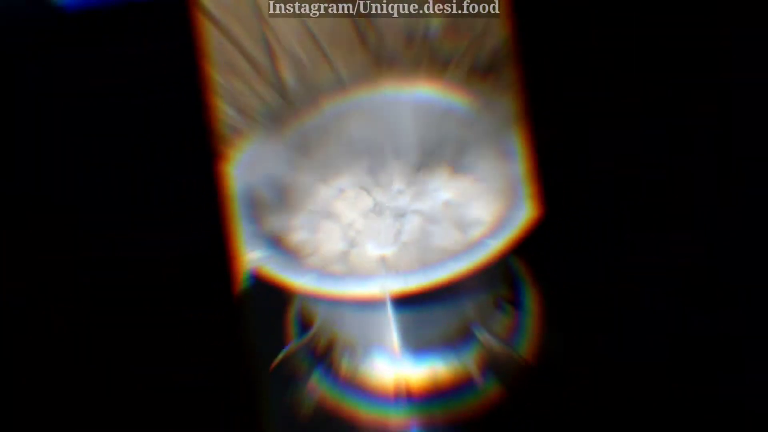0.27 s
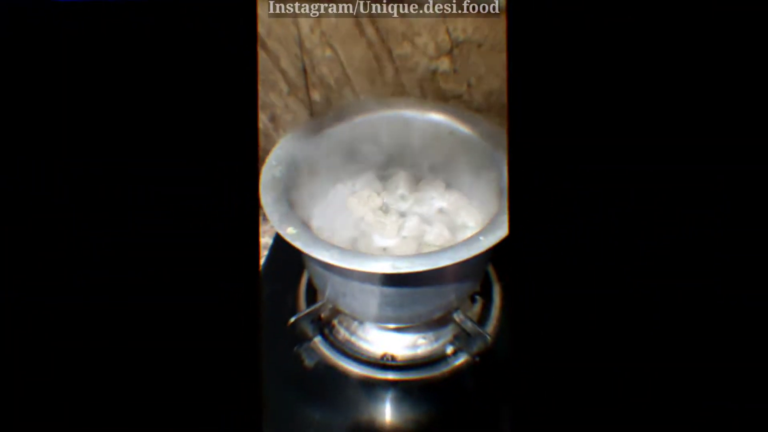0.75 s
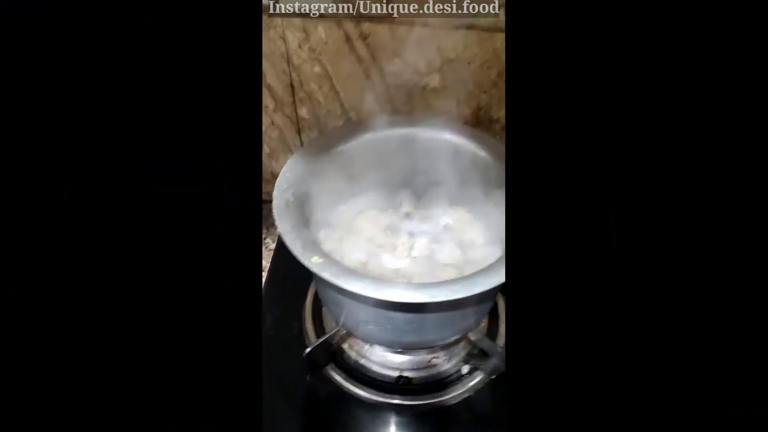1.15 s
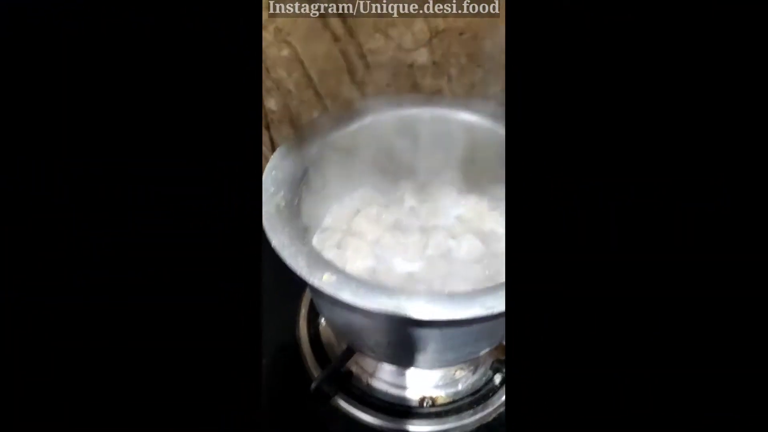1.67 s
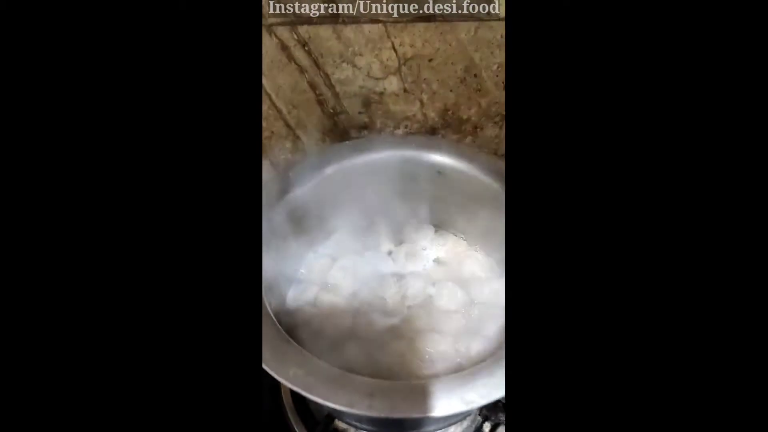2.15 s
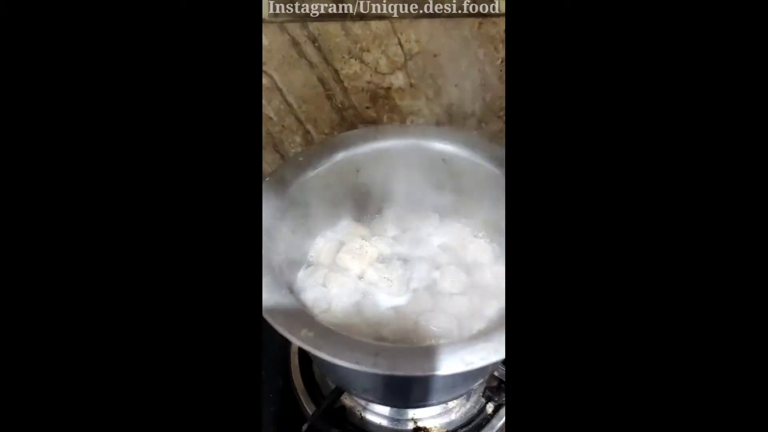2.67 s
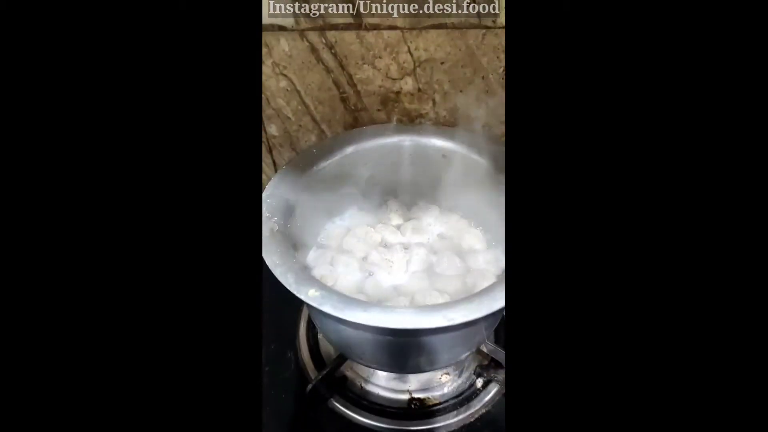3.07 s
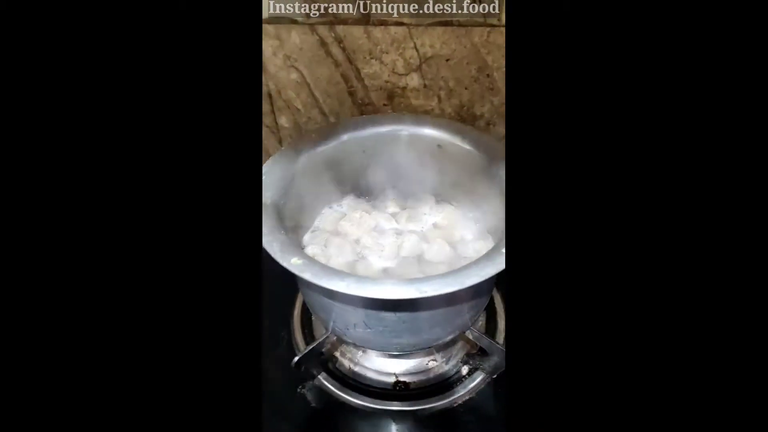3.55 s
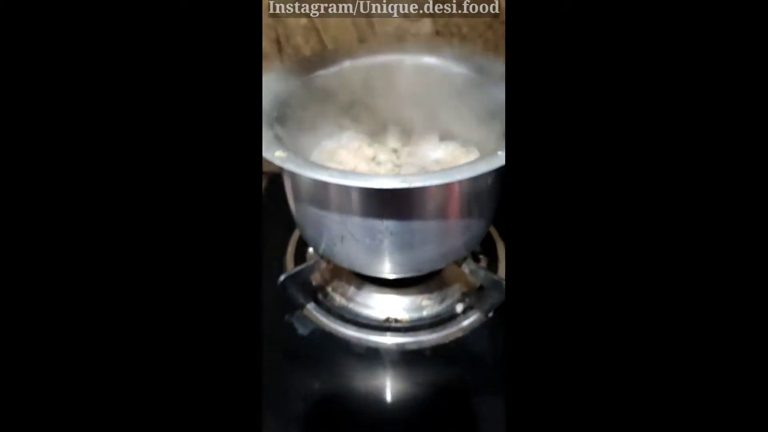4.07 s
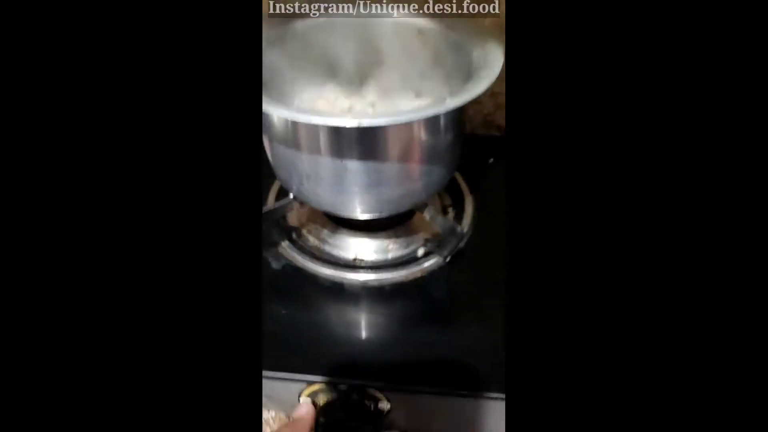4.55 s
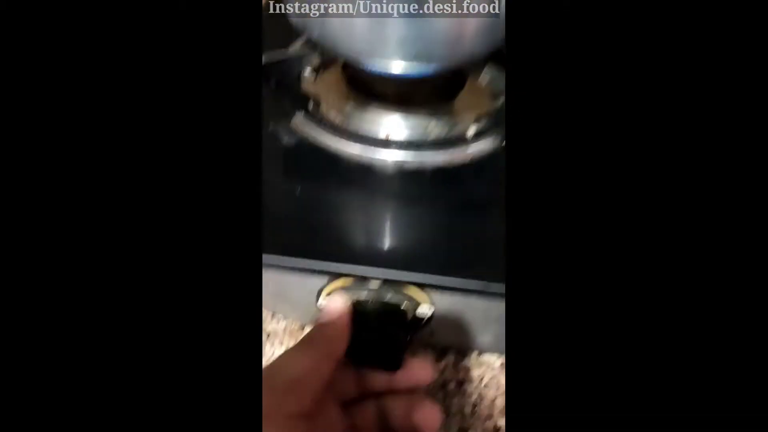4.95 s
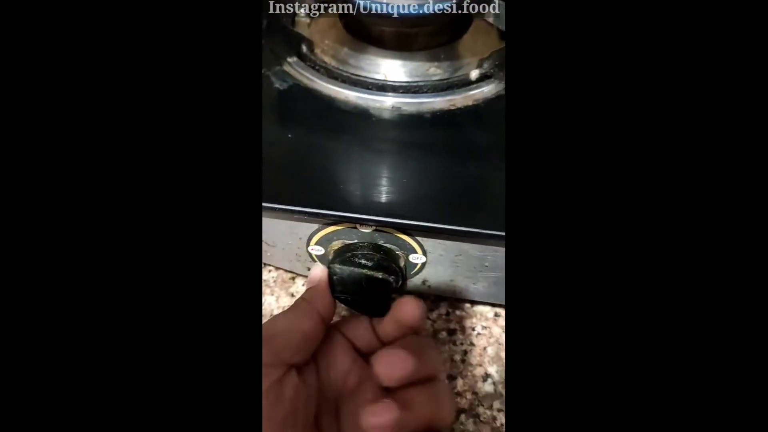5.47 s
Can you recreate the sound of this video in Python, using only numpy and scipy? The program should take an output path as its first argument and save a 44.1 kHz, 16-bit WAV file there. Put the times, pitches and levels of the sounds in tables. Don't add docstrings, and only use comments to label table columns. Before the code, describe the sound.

A busy kitchen with hard walls, heard close in stereo. From the start, water runs in uneven surges, a grainy hiss of droplets, bubbles and gurgles with small splashes and hollow plops. Thin, high bangle clinks appear at about 0.4, 0.9 and 1.8 seconds. Splashing thickens around 1.2, and a dry tap on the microphone lands near 2.1. Two short hollow knocks come at 2.3, then a bright clink and sharp splash at 2.6, and another heavy splash at 3.0. The flow eases, surging again near 3.7, with spatter around 4.4. Steel lid and vessel knocks ring dully at 4.7, 5.0 and 5.2 amid heavier splashes, and a tipped vessel gives a brief rising tone. At 5.5 a loud metallic bang rattles several times, throwing water and ringing unevenly to the end. Low traffic and burner rumble and a wavering drone run underneath throughout, with faint microphone hiss.

```python
import sys
import numpy as np
from scipy import signal
from scipy.io import wavfile

SR = 44100
rng = np.random.default_rng(int(sys.argv[2]) if len(sys.argv) > 2 else 0)


def elevation(decibels):
    levels = np.asarray(decibels, float)
    return 10 ** (levels / 20)


def generate_wav(signal):
    frames = np.transpose(np.atleast_2d(signal))
    scaled = np.clip(frames, -1, 1) * 32767
    pcm = np.round(scaled).astype(np.int16)
    wavfile.write(sys.argv[1], SR, pcm)


N = 251807
TIME = np.arange(N) / SR

# t/s, level/dB
BANG = [
    (5.519, -10.5),
    (5.558, -17),
    (5.585, -24),
    (5.629, -35),
]


def rms_one(x):
    return x / np.sqrt(np.mean(x ** 2) + 1e-20)


def at_hz(points, hz):
    f, value = np.array(points)[:, :2].T
    return np.interp(np.log(hz), np.log(np.maximum(f, 1)), value)


def filtered(x, order, corner_hz, kind):
    return signal.sosfilt(signal.butter(order, corner_hz, kind, fs=SR, output="sos"), x)


def drift(rate_hz):
    step = 40
    r = np.exp(-2 * np.pi * rate_hz * step / SR)
    white = rng.standard_normal(N // step + 2002)
    slow = signal.lfilter([1], [1, -2 * r, r * r], white)[2000:]
    return np.interp(np.arange(N) / step, np.arange(len(slow)), rms_one(slow))


def dying(start_s, t60, rise_s):
    first = int(start_s * SR)
    t = np.arange(min(int(1.2 * t60 * SR), N - first)) / SR
    return slice(first, first + len(t)), (1 - np.exp(-t / rise_s)) * elevation(-60 * t / t60)


def add_mode(out, start_s, hz, level_db, t60, rise_s):
    span, shape = dying(start_s, max(t60, .02), rise_s)
    t = np.arange(len(shape)) / SR
    out[span] += elevation(level_db) * shape * np.sin(2 * np.pi * hz * t)


def bands(low_hz, count):
    # f/Hz, likeness/-1..1
    likeness = [(60, 0.96), (110, 0.93), (200, 1), (380, 1), (700, 0.4), (1290, -0.43), (2380, 0.076),
                (4400, -0.022), (8120, 0.026), (15000, -0.092)]
    # f/Hz, level/dB
    left_lead = [(60, 2), (130, 2.5), (290, 5), (640, 6), (1410, 3), (3100, -1), (6820, 4.5), (15000, -2)]
    white = rng.standard_normal((2, 2, N))
    edges = np.minimum(low_hz * 2 ** (np.arange(count + 1) / 3), .45 * SR)
    for k, (low, high) in enumerate(zip(edges, edges[1:])):
        pair = filtered(white[k % 2], 2, [low, high], "band")
        mid, side = pair / np.sqrt(2 * (high - low) / SR)
        hz = np.sqrt(low * high)
        alike = np.clip(at_hz(likeness, hz), -.99, .99)
        lean = elevation(at_hz(left_lead, hz) / 2 * np.array([[1], [-1]]))
        stereo = np.sqrt(1 + alike) * mid + np.sqrt(1 - alike) * side * [[1], [-1]]
        yield hz, high - low, lean * stereo / 2 ** .5


def flow_power():
    # t/s, flow level/dB, fall level/dB (how hard the stream lands on steel)
    flow = [(0.0, -49, 0), (0.54, -44.5, 1), (1.19, -41, 0), (1.32, -51, 10), (1.43, -53, -5.5),
            (1.76, -50.5, -0.5), (2.22, -44, -3), (2.45, -59.5, 0), (2.96, -44, 0), (3.1, -45.5, 1.5),
            (3.4, -56.5, -6), (3.72, -38, 0.5), (3.85, -49, 1.5), (4.4, -44.5, -4), (4.8, -55.5, -6),
            (5.07, -44, 4), (5.34, -48, 1), (5.71, -39.5, -5)]
    s, flow_rows, fall_rows = np.transpose(flow)
    flow_db, fall_db = np.interp(TIME, s, flow_rows), np.interp(TIME, s, fall_rows)
    swing_db = flow_db + 50
    gurgle_db = -51 + 0.3 * (swing_db + fall_db)
    wash_db = -51 + 0.95 * swing_db + fall_db
    spray_db = flow_db + 0.5
    power = [elevation(2 * level_db) for level_db in (gurgle_db, wash_db, spray_db)]
    span, shape = dying(5.53, t60=0.52, rise_s=0.024)
    for layer, level_db in zip(power, (-46, -12, -20)):
        layer[span] += (elevation(level_db) * shape) ** 2
    return power


def splashes():
    # t/s, peak level/dB, brightest f/Hz
    spatters = [(0.198, -33.5, 3550), (0.261, -28.5, 8590), (0.3594, -30, 10600), (0.4005, -34.5, 9700),
                (0.7512, -33, 8250), (0.778, -28, 6600), (0.91, -28, 6800), (0.9797, -29.5, 9680),
                (1.757, -33, 3930), (1.9994, -30, 8080), (2.2194, -31.5, 7100), (2.315, -26.5, 9300),
                (2.6354, -31, 9680), (2.864, -28, 9800), (3.5344, -35, 7750), (3.636, -23, 9200),
                (4.2657, -30.5, 2460), (4.369, -28, 10100), (4.412, -27, 6300), (4.437, -26, 8000),
                (4.8943, -42, 3640), (4.9387, -34.5, 7700), (5.3532, -29, 7250), (5.4887, -30, 7500)]
    # t/s, spray peak level/dB, wash level/dB, brightest f/Hz
    slops = [(0.025, -31.5, -46, 9700), (0.108, -37, -39, 8460), (0.2887, -29.5, -37, 9740),
             (0.582, -32, -35.5, 2840), (0.9394, -37, -35, 2430), (1.148, -21, -38, 7600),
             (1.208, -22, -30, 5040), (1.275, -21.5, -33, 7200), (1.7893, -32, -40.5, 9690),
             (2.0627, -27.5, -36, 8150), (2.167, -30, -38.5, 10800), (2.372, -29.5, -41.5, 8500),
             (2.6564, -25, -43, 9500), (2.704, -29, -33, 2860), (2.725, -29, -28, 1600),
             (3.0085, -14, -22, 6660), (3.011, -16, -40, 3800), (3.03, -16, -28, 3200),
             (3.055, -19, -34, 3700), (3.297, -34, -43, 3000), (3.346, -30, -44, 9700),
             (3.385, -38, -45, 3200), (3.54, -39, -43, 1300), (3.602, -34, -42, 2850),
             (3.775, -32, -40, 4500), (4.31, -31, -42, 5000), (4.486, -29, -37, 3000),
             (5.162, -28.5, -31, 4500), (5.4205, -20, -37, 7850)]
    # t/s, spray peak level/dB, gurgle level/dB, t60/s, brightest f/Hz
    dumps = [(0.4984, -30, -38.5, 0.14, 8900), (0.6554, -36.5, -42, 0.82, 8530),
             (0.8086, -24, -36, 0.35, 4380), (0.886, -30, -41.5, 0.59, 9700),
             (1.0204, -24, -35.5, 0.23, 9020), (1.895, -37, -41.5, 0.39, 9680),
             (2.6208, -8.5, -36.5, 0.23, 8800), (2.7374, -26, -46, 0.55, 9700),
             (3.0294, -13.5, -50, 0.24, 7600), (3.058, -20, -42, 0.19, 10700),
             (3.997, -29.5, -42, 0.3, 4460), (4.46, -25, -32, 0.37, 7340), (4.658, -27, -30.5, 0.31, 4120),
             (5.0136, -16.5, -31.5, 0.29, 8140), (5.1976, -20, -31, 0.33, 8400)]
    rows = [(s, spray_db, -90, -90, 0.4, hz) for s, spray_db, hz in spatters]
    for s, spray_db, wash_db, hz in slops:
        rows.append((s, spray_db, wash_db, wash_db - 20.5, 0.37, hz))
    for s, spray_db, gurgle_db, t60, hz in dumps:
        wash_db = -19.5 + 0.52 * spray_db
        rows.append((s, spray_db, wash_db, gurgle_db, t60, hz))
    return rows


def bubbles(gain, hz):
    out = np.zeros((2, N))
    drops_per_s = 260 / 20
    for when, pitch, size, side, other in rng.random((int(drops_per_s * N / SR), 5)):
        span, shape = dying(when * N / SR, t60=45 / hz ** .85, rise_s=3.5 / hz)
        t = np.arange(len(shape)) / SR
        phase = 2 * np.pi * hz * 2 ** ((pitch - .5) / 3) * (t + .3 * t ** 2)
        size_db = -4 - 1.17 * np.log2(hz / 1000) + 14.4 * size
        side_db = 16.8 * (side - .5) * np.array([[1], [-1]])
        ear_phase = [[0], [other * min(hz / 150, 2 * np.pi)]]
        out[:, span] += gain[span.start] * elevation(size_db + side_db) * shape * np.sin(phase + ear_phase)
    return out


def add_splash_glints(gain, hz, events):
    for s, spray_db, _, _, t60, bright_hz in events:
        octaves = np.log2(bright_hz / hz)
        if abs(octaves) < .5:
            span, shape = dying(s, 0.69 * t60, 0.00047)
            gain[span] = np.hypot(gain[span], elevation(spray_db - 13 - 160 * octaves ** 2) * shape)


def add_bang_wash(gain, hz, width):
    # f/Hz, level/dB per Hz
    bang_colour = [(88, -66), (150, -51), (274, 0), (413, -12), (512, -30), (575, -2), (883, 0),
                   (1330, -2.5), (1890, -2), (3520, -17), (4600, -10), (7530, -11), (14600, -15),
                   (15800, -33)]
    # f/Hz, t60/s
    bang_decay = [(200, 0.3), (700, 0.52), (2000, 0.27), (6000, 0.33), (14000, 0.28)]
    for s, bang_db in BANG:
        span, shape = dying(s, at_hz(bang_decay, hz), 0.71 / hz)
        uneven_db = 2.64 * rng.standard_normal()
        level_db = bang_db + at_hz(bang_colour, hz) - 32.5 + uneven_db
        gain[span] = np.hypot(gain[span], elevation(level_db) * np.sqrt(width) * shape)


def water_and_bang():
    # f/Hz, level/dB per Hz
    water_colour = [(100, -44), (170, -48), (198, -8.5), (336, 0), (540, -5), (666, -0.5), (1050, -5.5),
                    (1250, -8), (1620, -4), (2660, -7.5), (4970, -8), (6010, -10.5), (9470, -8),
                    (15800, -20.5)]
    power, events = flow_power(), splashes()
    for s, spray_db, wash_db, gurgle_db, t60, _ in events:
        span, shape = dying(s, max(t60, .05), 0.002)
        for layer, level_db in zip(power, (gurgle_db - 4.5, wash_db - 4.5, spray_db - 11)):
            layer[span] += (elevation(level_db) * shape) ** 2
    level = np.log(power) / 2
    out, surge = 0, drift(10)
    for hz, width, noise in bands(200.03, count=20):
        place = np.interp(np.log(hz), np.log([600, 2000, 6500]), [0, 1, 2])
        shares = np.maximum(1 - np.abs(place - np.arange(3)), 0)
        flicker_db = 0.13 * surge + 2.34 * drift(11.6) + 1.04 * drift(61)
        colour = elevation(at_hz(water_colour, hz) - 30 + flicker_db) * np.sqrt(width)
        gain = colour * np.exp(shares @ level)
        out = out + bubbles(gain, hz)
        add_splash_glints(gain, hz, events)
        add_bang_wash(gain, hz, width)
        out = out + gain * noise
    return filtered(out, 6, 245, "high")


def swelling(idle_db, swells, approach_s, leave_s):
    s, peak_db = np.transpose(swells)[:2]
    t = TIME[::64, None]
    away = np.where(t < s, (s - t) / np.maximum(approach_s, .02), (t - s) / leave_s)
    power = elevation(2 * idle_db) + elevation(2 * (peak_db - 15 * away)).sum(axis=1)
    return np.interp(TIME, t[:, 0], 10 * np.log10(power))


def rumble():
    # f/Hz, level/dB per Hz
    rumble_colour = [(12, -32), (20, 5.5), (48, 5.5), (98, -1), (131, -14), (184, -55.5), (220, -26),
                     (290, -56), (480, -120)]
    # f/Hz, level/dB, width/Hz
    hums = [(104.35, -0.5, 2.2), (130.9, -8, 1.9), (79.7, -11.5, 2.7)]
    # peak t/s, peak level/dB
    rumble_swells = [(0.0, -44), (1.301, -43), (1.57, -46), (1.76, -50), (2.1, -49), (2.67, -40.5),
                     (2.95, -42), (3.3, -44), (3.88, -47), (4.68, -41.5), (5.07, -46), (5.5, -43)]
    # peak t/s, peak level/dB, approach/s
    drone_swells = [(0.95, -52, .2), (1.26, -38, 0.42), (1.37, -39, .4), (1.48, -38, 0.43), (1.58, -37, .4),
                    (1.69, -33.5, 0.42), (1.91, -40.5, 0.34), (2.67, -46, 0.11), (2.85, -39.5, 0.2),
                    (3.77, -46, 0.37), (4.7, -46, .3), (5.0, -39.5, 0.47), (5.2, -39, .4),
                    (5.36, -34, 0.46)]
    # peak t/s, peak level/dB
    hum_swells = [(0.0, -49), (0.41, -53), (0.75, -48), (1.24, -41), (1.57, -44), (1.91, -53.5),
                  (2.08, -49.5), (2.53, -40), (2.87, -42), (3.0, -48), (3.3, -43.5), (3.82, -43),
                  (4.35, -54), (4.68, -38.5), (5.07, -40.5), (5.63, -39)]
    rumble_db = swelling(-49.5, rumble_swells, approach_s=0.31, leave_s=0.19)
    drone_db = swelling(-59, drone_swells, np.transpose(drone_swells)[2], leave_s=0.07)
    hum_db = swelling(-55, hum_swells, approach_s=0.24, leave_s=.17)
    noise = 0
    for hz, width, band in bands(20.66, count=10):
        noise = noise + elevation(at_hz(rumble_colour, hz)) * np.sqrt(width) * band
    noise = filtered(noise, 6, 165, "low")
    hum = 0
    for hz, level_db, width in hums:
        r = np.exp(-np.pi * width / SR)
        resonance = [1, -2 * r * np.cos(2 * np.pi * hz / SR), r * r]
        ringing = signal.lfilter([1, 0, -1], resonance, rng.standard_normal(N))
        hum = hum + elevation(level_db) * rms_one(ringing)
    drone_hz = 58.9 + 0.5 * drift(2.92)
    drone = np.sin(2 * np.pi * np.cumsum(drone_hz) / SR)
    lean = elevation([[.8], [-.8]])
    tones = elevation(drone_db + 4) * drone + elevation(hum_db - 1) * hum
    return elevation(rumble_db + 1) * rms_one(noise) + lean * tones


def plops():
    # t/s, peak level/dB, f/Hz, t60/s
    plop_rows = [(0.0238, -33, 4760, 0.06), (0.03, -38, 5300, .07), (0.0742, -30, 4760, 0.07),
                 (0.345, -33, 4250, .08), (0.222, -36, 4250, .05), (0.582, -35, 4050, .06),
                 (1.36, -48, 1400, .7), (5.44, -38, 1700, .12), (2.33, -23, 1670, 0.067),
                 (2.33, -19.5, 1985, 0.053), (3.0214, -29, 1154, 0.19), (2.622, -27, 2350, .15),
                 (2.745, -36, 700, .3), (2.748, -28, 2020, .06), (2.9, -40, 1750, .3),
                 (2.95, -36, 1700, .2), (3.028, -30, 1600, .1), (3.056, -27, 1650, .08),
                 (0.822, -32, 3080, .08), (1.038, -33, 3750, .08), (3.9694, -40, 1098, 0.4),
                 (4.1644, -40, 1094, 0.25), (2.727, -41, 487, 0.54), (4.021, -43, 392, 0.77),
                 (4.484, -32, 401, 0.2), (4.486, -32, 609, 0.22), (5.3677, -26, 1410, 0.073)]
    # t/s, peak level/dB, f/Hz
    gulp_rows = [(0.494, -39, 681), (0.47, -42, 760), (0.5906, -44, 1040), (0.655, -37, 760),
                 (0.70, -39, 850), (0.839, -42, 800), (0.9423, -36, 1830), (1.0705, -40, 1040),
                 (1.169, -43, 315), (1.962, -39, 1420), (2.178, -42, 875), (2.725, -42.5, 738),
                 (2.8973, -40.5, 1960), (3.034, -32, 1070), (3.041, -39, 732)]
    out = np.zeros(N)
    for s, peak_db, hz, t60 in [*plop_rows, *[(*gulp, 0.3) for gulp in gulp_rows]]:
        add_mode(out, s, hz, peak_db - 2.5, 0.51 * t60, rise_s=0.0018)
    return out


def bangles():
    # t/s, peak level/dB, upper ring level/dB, top ring level/dB, t60/s
    clinks = [(0.0258, -39, -57, -57, 0.11), (0.4017, -31, -52, -48, 0.14), (0.8838, -34, -39, -52, 0.36),
              (0.98, -31, -41, -58, 0.17), (1.7922, -35.5, -43, -46, 0.2), (1.8463, -43, -62, -63, 0.21),
              (1.935, -38, -45, -41, 0.079), (2.6341, -19, -36, -37, 0.15),
              (2.6456, -14.5, -40, -40, 0.065), (2.743, -29, -45, -43, 0.11), (2.787, -45, -53, -59, 0.15),
              (2.868, -38, -56, -61, 0.1), (3.0574, -48, -29, -46, 0.088), (3.4306, -39, -51, -56, 0.15),
              (4.7255, -33.5, -58, -63, 0.11), (5.1, -38, -48, -62, 0.11)]
    bangle_hz = [9685, 9728, 10810, 15470]
    out = np.zeros(N)
    for s, peak_db, upper_db, top_db, t60 in clinks:
        levels_db = (peak_db + 2, peak_db - 12, upper_db + 3.5, top_db + 13)
        for hz, level_db in zip(bangle_hz, levels_db):
            add_mode(out, s, hz, level_db, t60, rise_s=.003)
    return out


def tap():
    t = (TIME - 2.0722) / 0.00048
    return elevation(-19.5) * (np.exp(-(3 * t) ** 2) - 0.2 * np.exp(-(1.2 * (t - 1.2)) ** 2))


def metal():
    # t/s, peak level/dB, share of free ring time
    knock, full_knock, lid_knock = (5.016, -30, 0.87), (5.199, -31.5, 0.9), (4.658, -38.5, 0.72)
    vessel_hz, full_hz = [308, 554, 791, 993, 1674, 1880, 2449, 3117, 4328, 4920], [307, 549, 1030, 1880, 2449, 4436, 4592]
    lid_hz, bang_hz = [215, 312, 458, 996, 1626, 2369, 3763, 4242], [273, 380, 409, 459, 840, 866, 918, 1040, 1158, 1194, 1254, 1500,
                                       1643, 1832, 1878, 2323, 2410, 2573]
    # level/dB, t60/s
    vessel, full, lid = [(0, 0.12), (-14, .3), (-6, .17), (-6, 0.7), (-9, 0.35), (3, 0.08), (1, 0.28),
                         (-9, .12), (-10, .25), (-5, .08)], [(3, .11), (-12, .25), (-10, .25), (-6, .08), (-10, .1), (-10, .3),
                                         (-7, .2)], [(-5, 0.35), (-3, 0.206), (-6, 0.3), (2, 0.14),
                                                       (1.5, 0.42), (-12, 0.26), (-6, 0.22), (-6, 0.22)]
    # delay/s, level/dB, t60/s
    bang_modes = [(0.062, -24, 0.33), (0.0031, -26, 0.25), (.05, -23, 0.3), (0.0031, -37, 0.5),
                  (.04, -27, 0.54), (0.0029, -27, 0.38), (.01, -23.5, 0.35), (0.00128, -13.5, 0.12),
                  (0.00308, -35, 0.59), (0.042, -33, 0.56), (.02, -24.5, 0.8), (0.0008, -12, 0.068),
                  (.03, -30, 0.25), (0.045, -30, 0.2), (.038, -16, 0.22), (.09, -28, 0.4),
                  (0.0372, -30, 0.31), (0.035, -20, .1)]
    groups = np.zeros((5, N))
    knocks = [(knock, vessel_hz, vessel), (full_knock, full_hz, full), (lid_knock, lid_hz, lid)]
    for (s, peak_db, freedom), pitches, modes in knocks:
        for k, (hz, (level_db, t60)) in enumerate(zip(pitches, modes)):
            add_mode(groups[k % 5], s, hz, peak_db + level_db, freedom * t60, rise_s=0.0011)
    for k, (hz, (delay_s, level_db, t60)) in enumerate(zip(bang_hz, bang_modes)):
        start_s = BANG[0][0] + delay_s
        add_mode(groups[k % 5], start_s, hz, level_db + 1, t60, rise_s=.0005 + .2 * delay_s)
    return sum(group * elevation(2.3 * drift(30)) for group in groups)


def tipped_vessel():
    # t/s, length/s, start f/Hz, final f/Hz, level/dB
    tipped = [
        (5.2, .09, 770, 832, -39),
        (5.205, .2, 1722, 1775, -38),
        (5.21, .07, 2420, 2530, -46),
        (5.215, .09, 1388, 1412, -41),
        (5.245, .13, 2062, 2103, -44),
    ]
    out = np.zeros(N)
    for s, length_s, hz, final_hz, level_db in tipped:
        u = np.arange(int(length_s * SR)) / (length_s * SR)
        pitch = final_hz + (hz - final_hz) * (1 - u) ** 3
        tone = np.sin(2 * np.pi * np.cumsum(pitch) / SR)
        out[int(s * SR):][:len(u)] += elevation(level_db) * np.sin(np.pi * u) ** .5 * tone
    return out


def kitchen(x):
    t = np.arange(SR // 2) / SR
    decay = elevation(-60 * t / 0.51) * (t > .004)
    common, left, right = rng.standard_normal((3, len(t))) * decay
    tails = filtered(common, 2, 600, "low") + filtered([left, right], 2, 600, "high")
    tails = tails / np.sqrt(np.sum(common ** 2))
    return elevation(2) * signal.fftconvolve(x[None], tails, axes=1)[:, :N]


def scene():
    steel = metal()
    near = (plops() + bangles() + tipped_vessel()) * elevation(2.2 * drift(50))
    close = elevation(-0.5) * steel + near
    direct = np.array([elevation(1.5) * np.roll(close, 1), elevation(-1.5) * close])
    echo = kitchen(elevation(-3) * steel + elevation(-8) * near)
    hiss = elevation(-58) * np.diff(rng.standard_normal((2, N + 1)))
    return water_and_bang() + direct + echo + tap() + rumble() + hiss


def band_limit(x):
    return signal.sosfilt(signal.butter(12, 16540, fs=SR, output="sos"), x)


def record(dry):
    held = np.clip(dry, -1, 1)
    top_cut = signal.ellip(8, .5, 60, 15500, fs=SR, output="sos")
    return band_limit(signal.sosfilt(top_cut, held))


dry = scene()
out = record(dry)
generate_wav(out)
```